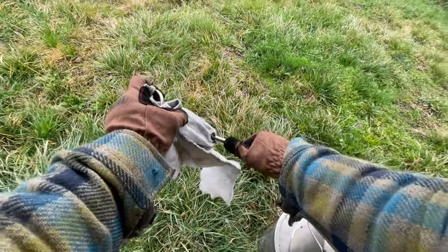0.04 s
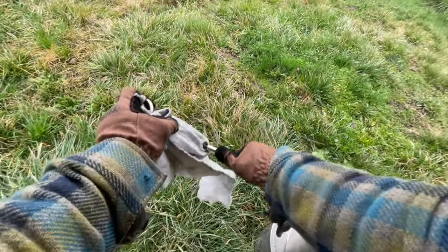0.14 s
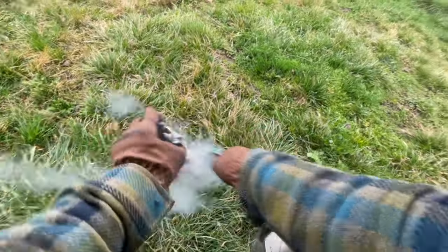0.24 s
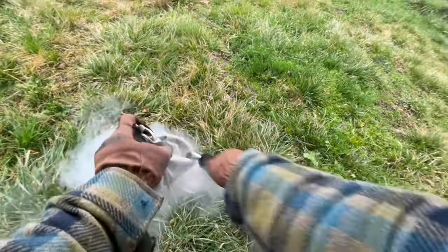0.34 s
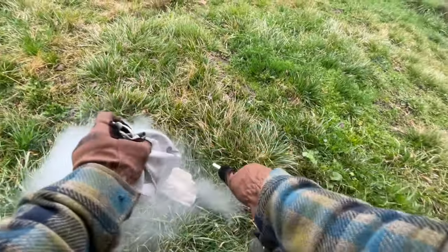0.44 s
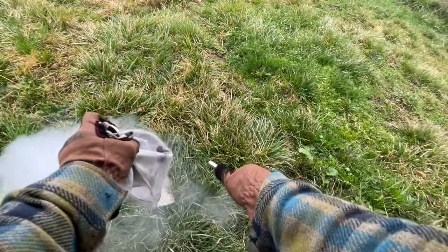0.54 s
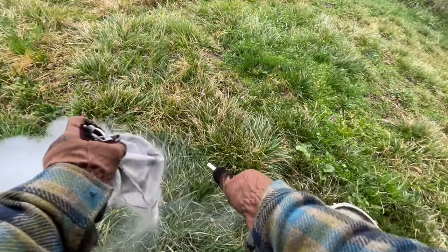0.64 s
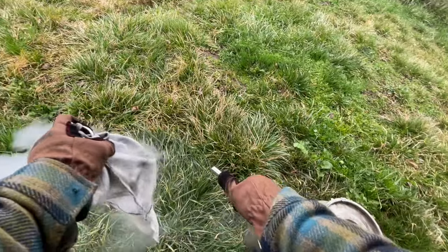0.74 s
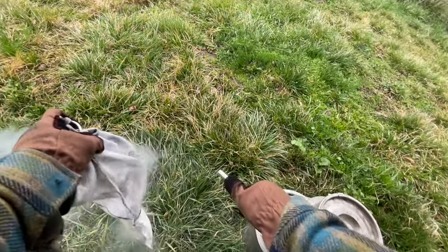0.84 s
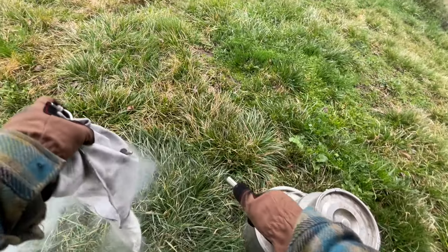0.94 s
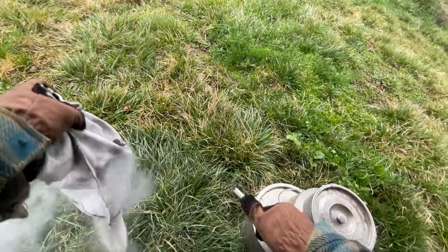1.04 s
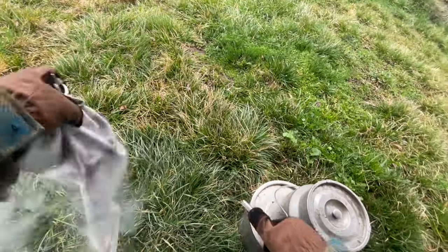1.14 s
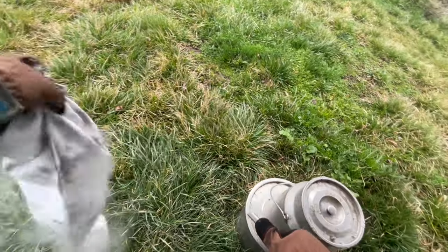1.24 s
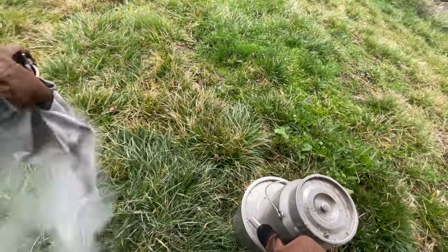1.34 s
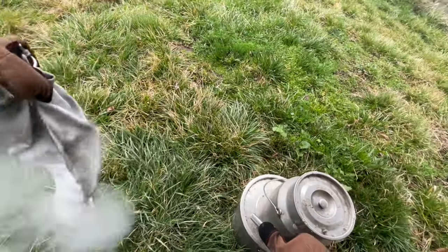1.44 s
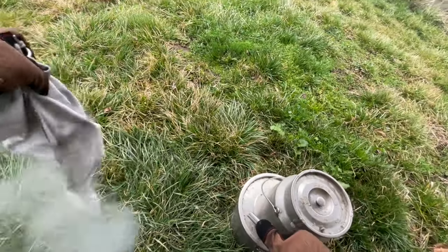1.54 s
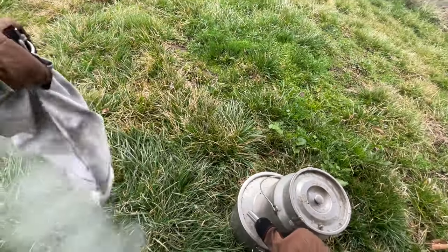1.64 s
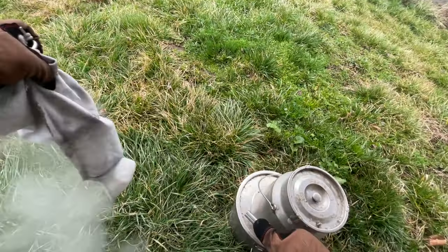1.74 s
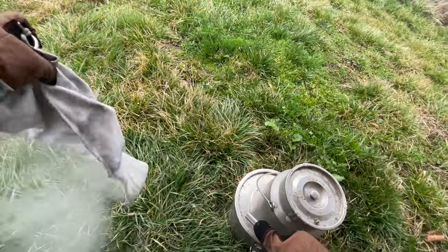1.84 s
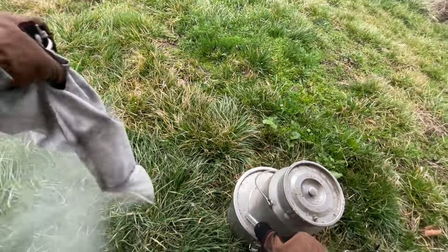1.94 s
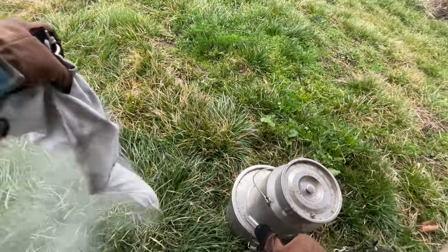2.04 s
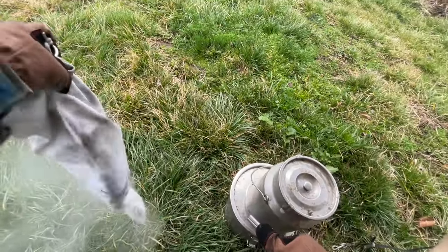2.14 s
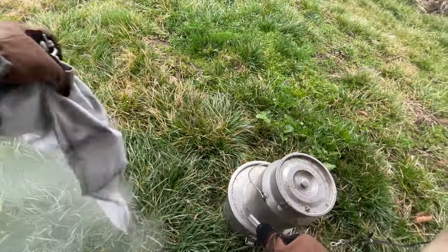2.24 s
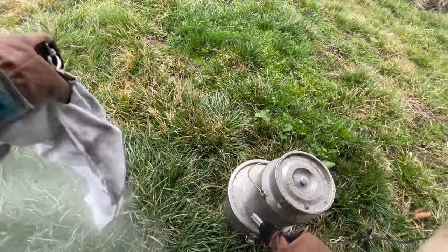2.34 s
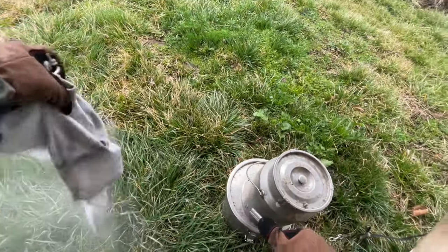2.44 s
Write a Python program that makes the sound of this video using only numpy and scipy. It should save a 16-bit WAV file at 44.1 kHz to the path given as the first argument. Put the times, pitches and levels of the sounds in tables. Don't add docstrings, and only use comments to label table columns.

```python
import sys
import numpy as np
from scipy import signal
from scipy.io import wavfile
from scipy.ndimage import uniform_filter1d

SR = 44100
rng = np.random.default_rng(int(sys.argv[2]) if len(sys.argv) > 2 else 0)


def gain_from_decibels(decibels):
    exponent = np.asarray(decibels, float) / 20
    return 10 ** exponent


def pcm_store(signal):
    levels = np.round(np.clip(np.atleast_2d(signal), -1, 1) * 32767)
    wavfile.write(sys.argv[1], SR, levels.astype(np.int16).T)


N = 110250
T = np.arange(N) / SR

LEAK_S, BURST_S, THUMP_S = .1985, .218, .2197
LEFT_LAG = 13

# pitch_hz, left_db, right_db, left_lead_rad
GAP_WHISTLES = [(466.5, -4.5, -7, 0), (600.6, -3.5, -14, 1.5), (1022.7, -5, -3, 2.5),
                (1408, -19, -6, -1.26), (1926, -20.5, -8.5, -0.1), (2200, -21.5, -7.5, -1.8),
                (2424, -22, -13, 2.5), (3380, -21.5, -10, 2.5), (4220, -30.5, -12, 0.4),
                (4830, -15, -7.5, 1.34), (5430, -10.5, -7.5, 2), (5900, -9, -8.5, 2),
                (6170, -12.5, -9.5, 2), (6790, -19, -19, 1.1), (7310, -16, -27.5, 2)]
# swing_rad, push_db, push_t60_s, slow_tail_db
THUMP_PORTS = [
    (5.5, -3, 0.043, -17.5),
    (6.1, -7, 0.045, -39.5),
]
# centre_s, level_db, half_width_s, pitch_hz
SACK_SWELLS = [
    (0.387, -32, 0.064, 48.9),
    (0.586, -37.5, 0.069, 48.2),
    (.72, -42, 0.043, 46),
]
# centre_s, level_db, half_width_s, pitch_hz
SQUEAKS_AND_RINGS = [
    (0.543, -68, 0.011, 2840),
    (.56, -66, 0.0065, 3200),
    (.425, -63, 0.022, 10040),
    (.43, -69, 0.029, 8600),
    (1.25, -68, 0.023, 8500),
    (1.5, -68, 0.036, 8500),
]
# start_s, peak_db, centre_hz
SNAPS = [(0.0144, -66, 2580), (0.0274, -63, 1500), (0.0717, -49, 1640), (0.0976, -60, 1780),
         (0.1198, -55, 1870), (0.1446, -47, 1840), (0.1555, -51, 2540), (0.1724, -49.5, 5770),
         (1.1535, -47, 3950), (1.1885, -47.5, 3330), (1.2022, -37.5, 7000), (1.2781, -35, 3130),
         (1.3478, -41.5, 2560), (1.4112, -45, 2200), (1.4671, -32, 6850), (1.5176, -44.5, 2480),
         (1.5748, -46, 3510), (1.5926, -38, 9480), (1.6064, -39, 2174), (1.9748, -38, 3380),
         (2.0738, -45, 2230), (2.1498, -23, 2700), (2.1917, -36, 6980), (2.2498, -27.5, 6980),
         (2.3096, -56, 6880), (2.3281, -34, 3760), (2.3325, -29.5, 3690), (2.3453, -27.5, 3140),
         (2.4159, -34, 2990)]
# start_s, peak_db, pitch_hz
CLICKS = [(0.0144, -49, 2440), (0.3025, -54.5, 4210), (0.3599, -38.5, 9100), (0.3595, -54, 2700),
          (0.7436, -45, 2340), (0.745, -42.5, 1560), (0.7487, -44.5, 2042), (0.864, -57, 4630),
          (1.239, -41, 2200), (1.2793, -30.5, 3220), (1.3507, -50, 2480), (1.468, -44, 3400),
          (1.6004, -45, 3270), (1.6422, -45.5, 3250), (1.698, -42.5, 2130), (1.768, -40, 1250),
          (1.773, -46.5, 3460), (1.797, -43, 950), (1.8555, -43, 3370), (1.9765, -26, 3380),
          (2.112, -48, 3380), (2.1508, -31, 2700), (2.2488, -39, 3140), (2.3287, -37.5, 3750),
          (2.346, -29, 3000), (2.415, -59, 2940)]
# start_s, peak_db, scrape_share_db, upper_modes_db
JINGLES = [(0.3581, -49, 5.5, 3), (0.391, -54.5, 0, 3), (0.4174, -53.5, 0, 7), (0.4643, -58.5, -1, 8),
           (0.5884, -52, -3, -11.5), (1.1129, -52, -4, -22), (1.2035, -47, 0, 6), (1.2197, -45.5, -3, -9),
           (1.2964, -39, -12, 7), (1.3058, -43, 1, -9), (1.4682, -41, -10, -3), (1.4868, -38, 0, 7),
           (1.5904, -52, -4.5, -3), (1.6015, -50.5, -2.5, -4), (1.6417, -56, -4, -9),
           (1.6652, -54.5, 0.5, -8), (1.7038, -51.5, -2, -3), (1.7539, -50.5, 0, -1), (1.8312, -42, 0.5, 3),
           (1.8614, -45, 5, 2), (1.916, -50.5, -6, -14), (1.933, -49.5, -6, -22), (2.02, -48.5, -4, -4),
           (2.1136, -49, -9, -15), (2.15, -46, -6, -1), (2.172, -37.5, -8.5, 8), (2.188, -46, -7, 1),
           (2.2498, -44, -16, -12), (2.316, -58, -11, -15), (2.3284, -45, 5, 3), (2.3453, -38, -3, 3),
           (2.416, -51.5, -8, 2), (2.458, -51, -6, -13)]
# pitch_hz, level_db, t60_s
LINK_MODES = [(6740, -9, .02), (6880, -3, .04), (7050, -10, .018), (8490, -27, .12), (10200, -6, .022),
              (11400, -12, .01), (12100, -8, .015)]
# start_s, peak_db, bump_hz
KNOCKS = [(0.744, -44.5, 151.5), (1.149, -42, 327.4), (1.202, -46, 468), (1.226, -39, 410),
          (1.251, -47, 304), (1.278, -37.5, 500), (1.309, -41, 540), (1.354, -41.5, 490), (1.417, -49, 296),
          (1.457, -44, 480), (1.496, -43.5, 310.5), (1.607, -53, 256), (1.699, -39, 345), (1.706, -45, 350),
          (1.759, -47, 536), (1.765, -32, 506), (1.779, -39.5, 248), (1.856, -36.5, 514), (1.928, -38, 538),
          (1.977, -37, 349), (2.107, -41, 190), (2.127, -41.5, 140), (2.149, -39.5, 341), (2.176, -34, 502),
          (2.199, -40.5, 496), (2.227, -43, 493), (2.243, -37.5, 520), (2.325, -38, 536),
          (2.358, -41.5, 530), (2.405, -48.5, 377), (2.472, -48.5, 340)]
# pitch_hz, level_db, t60_s
BODY_MODES = [(110, -6.5, 0.063), (204.5, -6, 0.026), (333, -3.5, 0.045), (367, 0.5, 0.038),
              (468.5, -1.5, 0.043), (528, 0, 0.085), (760, -4, 0.014), (940, -15, 0.016),
              (1203, -11.5, 0.021)]
# time_s, effort_db
SHAKE = [
    (1.0, -64.5),
    (1.25, -52.5),
    (1.6, -54),
    (1.8, -51.5),
    (2.05, -46),
    (2.2, -46),
    (2.5, -53),
]
# pitch_hz, level_db_per_hz
AIR_COLOUR = [(15, -59), (32, -35.5), (48, -5), (150, -19), (885, -28.5), (1010, -37), (7000, -45.5),
              (12500, -52.5)]
# time_s, level_db
AIR_LEVEL = [(0, -56.5), (.2, -50), (.3, -54), (.55, -54.5), (.8, -57.5), (1.05, -61.5), (2.0, -51.5),
             (2.5, -52)]
# pitch_hz, likeness (-1 to 1)
AIR_SAME = [(60, 1), (380, -0.081), (2380, -.8), (5200, 0.05)]
# pitch_hz, left_minus_right_db
AIR_BALANCE = [(60, 0.5), (380, -3), (2380, 3), (15000, 0)]


def burst():
    crack_s, puff_t60, low_t60 = .0008, 0.045, 0.098
    t, out = np.arange(8000) / SR, np.zeros((2, N))
    z = rng.standard_normal((3, 2, 8000))
    snap_open = t / crack_s * np.exp(1 - t / crack_s) * .5
    crack = gain_from_decibels(-5.5) * band(z[0], 10000, "low", order=1) * snap_open
    steam = evened(band(z[1], 3240, "low")) + gain_from_decibels(-10.5) * z[0]
    puff = gain_from_decibels(-19 - 60 * t / puff_t60) * steam
    low = gain_from_decibels(-22.5 - 60 * t / low_t60) * evened(band(z[2] + z[2, :1], 600, "low"))
    add(out, BURST_S - crack_s, crack + puff + low)
    add(out, THUMP_S - 20 / SR, np.array([thump(*port) for port in THUMP_PORTS]))
    add(out, LEAK_S, leak())
    return out


def leak():
    waver_db, waver_rad, waver_hz = 3, 0.81, 150
    level_db, rise_db, rise_bend = -14, 33, 2.5
    t = np.arange(0, BURST_S - LEAK_S + 0.0011, 1 / SR)
    opening = t / (BURST_S - LEAK_S)
    z = rng.standard_normal((2, 1200))[:, :len(t)]
    whistles = 0
    for hz, left_db, right_db, lead in GAP_WHISTLES:
        noises = rng.standard_normal((2, 4000))
        size, bend = (evened(band(noise, waver_hz, "low"))[-len(t):] for noise in noises)
        phase = 2 * np.pi * (hz * t + rng.random()) + waver_rad * bend
        left, right = gain_from_decibels(left_db) * np.cos(phase + lead), gain_from_decibels(right_db) * np.cos(phase)
        whistles = whistles + gain_from_decibels(waver_db * size) * np.array([left, right])
    roar = gain_from_decibels(-14.5) * band(z, 8300, "low", order=8)
    hiss = gain_from_decibels(-47 + 13 * np.minimum(opening, 1) ** 2) * z
    swell = gain_from_decibels(level_db - rise_db * np.maximum(1 - opening, 0) ** rise_bend) * np.minimum(t / .002, 1)
    cut_off = np.clip(1 - (opening - 1) / 0.16, 0, 1)
    return (2 * whistles + roar + hiss) * swell * cut_off


def thump(swing, push_db, t60, tail_db):
    fall_s, turns, tail_t60 = .0012, 2, .2
    t = np.arange(8000) / SR
    phase = swing * np.log(1 + t / fall_s)
    full = t[np.argmax(phase > 2 * np.pi * turns)]
    late = np.clip((t - .7 * full) / (.2 * full), 0, 1)
    after = np.maximum(t - full, 0)
    push = gain_from_decibels(push_db * late - 60 * after / t60)
    tail = gain_from_decibels(tail_db - 60 * after / tail_t60) * (1 - gain_from_decibels(-60 * after / t60))
    wave = np.cos(np.minimum(phase, 2 * np.pi * turns))
    return band(gain_from_decibels(-3.8) * (push + tail) * wave, 1500, "low", order=1)


def flutter():
    swells = 0
    for s, db, half_s, hz in SACK_SWELLS + SQUEAKS_AND_RINGS:
        envelope = gain_from_decibels(db) * np.exp(-.5 * ((T - s) / half_s) ** 2)
        swells = swells + envelope * np.cos(2 * np.pi * hz * (T - s))
    return pair(swells, right_db=-9.5)


def knocks():
    knock_s, rub_per_s = 0.012, 700
    out, t = np.zeros((2, N)), np.arange(6000) / SR
    for s, db, hz in KNOCKS:
        rung = ring(spread(count=6000) * np.exp(-t / knock_s), BODY_MODES, vary_db=2.5)
        thud = bump(t, hz, cycles=3.68, skew=0.58)
        add(out, s + 0.0016, gain_from_decibels(db - 1.5) * (thud + gain_from_decibels(1.5) * rung / abs(rung).max()))
    touching = uniform_filter1d(1. * (rng.random(N) < rub_per_s / SR), size=25) > 1e-6
    iron = evened(ring(spread(count=N) * touching, BODY_MODES, vary_db=0))
    rustle = spread(count=N) * gain_from_decibels(4.4 * evened(band(rng.standard_normal(N), 31.5, "low")))
    folds = resonate(rustle, 2140, 170) + resonate(rustle, 1280, 220)
    cloth = evened(band(rustle, 2320, "low") + (T > 1.76) * gain_from_decibels(3.0) * folds)
    rub = gain_from_decibels(-4) * iron + gain_from_decibels(-10) * cloth
    return out + rub * gain_from_decibels(curve(SHAKE)) * np.clip((T - 1.0) / 0.13, 0, 1)


def snaps():
    t60, width = 0.0166, 1.76
    out, t = np.zeros(N), np.arange(600) / SR
    for s, db, hz in SNAPS:
        dying = rng.standard_normal(len(t)) * gain_from_decibels(-60 * t / t60)
        tick = band(resonate(dying, hz, width * hz), 1300, "high")
        add(out, s, gain_from_decibels(db) * tick / abs(tick).max())
    return out


def clicks():
    scatter_db, scatter_t60, scatter_width = -8, 0.062, 0.93
    out, t = np.zeros(N), np.arange(3000) / SR
    for s, db, hz in CLICKS:
        tick = bump(t, hz, cycles=8.3, skew=0.49)
        z, lumps = rng.standard_normal((2, len(t)))
        coloured = resonate(z, 0.62 * hz, scatter_width * hz)
        coloured = resonate(coloured, hz, 2 * scatter_width * hz)
        grains = evened(coloured * abs(uniform_filter1d(lumps, 50)))
        scatter = gain_from_decibels(scatter_db - 60 * t / scatter_t60) * grains
        add(out, s - .0005, gain_from_decibels(db + 1) * (tick + scatter))
    return out


def jingles():
    taps_per_s, tap_spread_db, chatter_s = 800, 5, .018
    out, t = np.zeros(N), np.arange(5000) / SR
    for s, db, scrape_db, upper_db in JINGLES:
        u, z = rng.random(len(t)), rng.standard_normal(len(t))
        taps = (u < taps_per_s / SR) * gain_from_decibels(tap_spread_db * z) + (t == 0)
        drive = taps * np.clip(2 - 2 * t / chatter_s, 0, 1)
        modes = [(hz, d + (upper_db + 2) * (hz > 9000), t60) for hz, d, t60 in LINK_MODES]
        rung = ring(drive, modes, vary_db=3)[0]
        contact = signal.lfilter([1], [1, -np.exp(-1 / 100)], drive)
        scrape = band(resonate(z, hz=9900, width=12000), 3000, "high", order=1) * contact
        add(out, s, gain_from_decibels(db + 5.5) * (rung / abs(rung).max() + gain_from_decibels(scrape_db) * scrape / abs(scrape).max()))
    return out


def grit():
    ticks_per_s, tick_spread_db = 250, 3.5
    t = np.arange(200) / SR
    tick_db = tick_spread_db * np.minimum(rng.exponential(1, N), 3)
    size = (rng.random(N) < ticks_per_s / SR) * gain_from_decibels(tick_db)
    kind = rng.integers(0, 10, N)
    ticks = 0
    for k, hz in enumerate(np.geomspace(1300, 7500, 8)):
        tick = np.sin(2 * np.pi * hz * t) * np.exp(-t * hz / 0.57)
        ticks = ticks + np.convolve(size * (kind == k), tick)[:N]
    return gain_from_decibels(-12.5) * evened(ticks) * gain_from_decibels(curve(SHAKE)) * (T > SHAKE[0][0])


def air():
    patch_db = 3
    frames, hz = N // 256 + 5, np.fft.rfftfreq(1024, 1 / SR)
    a, b, c, d, patches = rng.standard_normal((frames, 513, 5)).T
    patches = evened(uniform_filter1d(uniform_filter1d(patches, 10, 0), 10, 1))
    same = np.clip(read(AIR_SAME, hz), -1, 1)[:, None]
    lag = np.exp(-2j * np.pi * hz * LEFT_LAG / SR)[:, None]
    lean = gain_from_decibels(read(AIR_BALANCE, hz) / 2)[:, None]
    right = a + 1j * b
    left = same * lag * right + np.sqrt(1 - same ** 2) * (c + 1j * d)
    z = np.array([lean * left, right / lean])
    z *= gain_from_decibels(read(AIR_COLOUR, hz)[:, None] + patch_db * patches)
    sound = signal.istft(z, nperseg=1024, noverlap=768)[1][:, :N]
    return gain_from_decibels(curve(AIR_LEVEL)) * evened(sound)


def bump(t, hz, cycles, skew):
    hump = np.sin(np.pi * np.minimum(t * hz / cycles, 1) ** skew) ** 2
    return hump * np.sin(2 * np.pi * hz * t)


def ring(drive, modes, vary_db):
    t = np.arange(min(drive.shape[-1], 8000)) / SR
    share = rng.standard_normal(len(modes))
    shape = 0
    for (hz, db, t60), z in zip(modes, share):
        shape = shape + gain_from_decibels(db + vary_db * z - 60 * t / t60) * np.sin(2 * np.pi * hz * t)
    return signal.fftconvolve(np.atleast_2d(drive), shape[None], axes=1)[:, :drive.shape[-1]]


def resonate(x, hz, width):
    pole = np.exp((2j * np.pi * hz - np.pi * width) / SR)
    return 2 * signal.lfilter([1 - abs(pole)], [1, -pole], x + 0j).real


def band(x, hz, kind, order=2):
    return signal.sosfilt(signal.butter(order, min(hz, SR * .45), kind, fs=SR, output="sos"), x)


def spread(count):
    same = 0.35
    a, b = rng.standard_normal((2, count))
    left = same * np.roll(a, LEFT_LAG) + np.sqrt(1 - same ** 2) * b
    return np.array([left, gain_from_decibels(-1) * a])


def pair(x, right_db):
    return np.array([np.roll(x, LEFT_LAG), gain_from_decibels(right_db) * x])


def evened(x):
    return x / np.sqrt(np.mean(x ** 2) + 1e-20)


def read(points, hz):
    f, value = np.transpose(points)
    return np.interp(np.log(hz + 1), np.log(f + 1), value)


def curve(rows):
    time_s, value = np.transpose(rows)
    return np.interp(T, time_s, value)


def add(mix, s, sound):
    part = mix[..., round(s * SR):][..., :sound.shape[-1]]
    part += sound[..., :part.shape[-1]]


def scene():
    rattle = pair(clicks() + snaps() + jingles() + grit(), right_db=-7.5)
    return burst() + flutter() + knocks() + rattle + air()


def roll_off(x):
    return signal.sosfilt(signal.butter(12, 16090, fs=SR, output="sos"), x)


def record(dry):
    knee = 1.6
    dull = band(dry, 13300, "low", order=24)
    top = gain_from_decibels(-22.5) * band(dry, 15200, "high", order=12)
    mix = np.clip(knee * np.tanh((dull + top) / knee), -1, 1)
    return roll_off(mix)


dry = scene()
out = record(dry)
pcm_store(out)
```